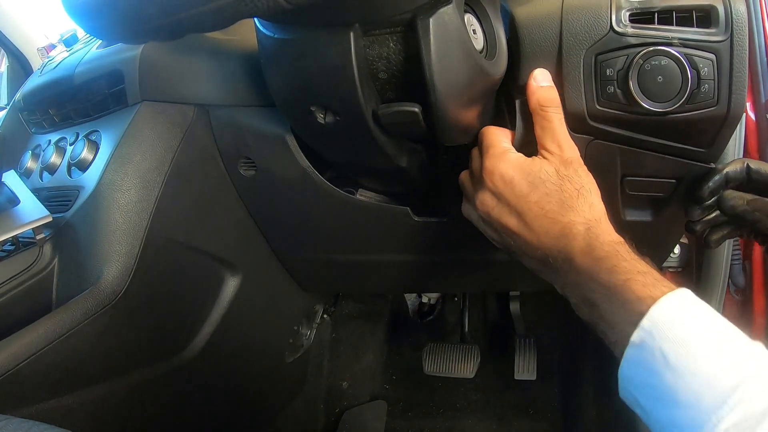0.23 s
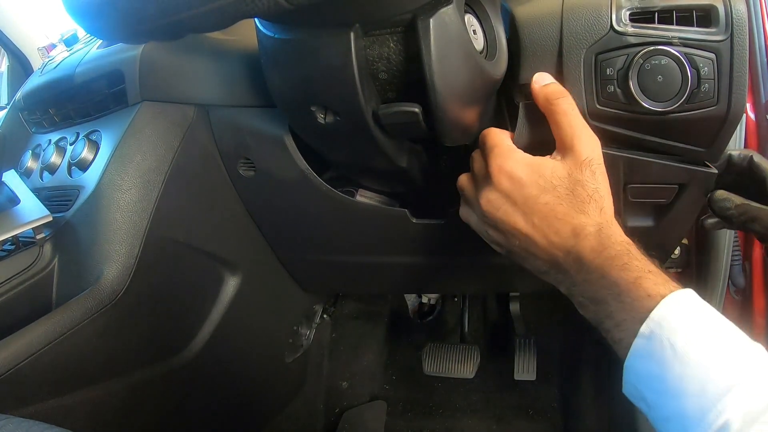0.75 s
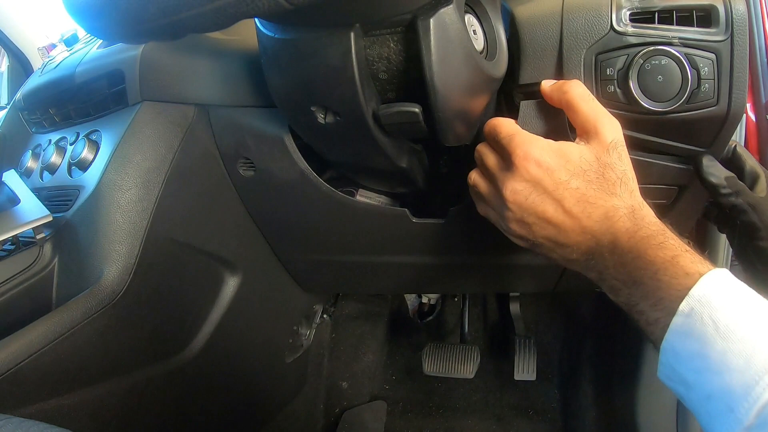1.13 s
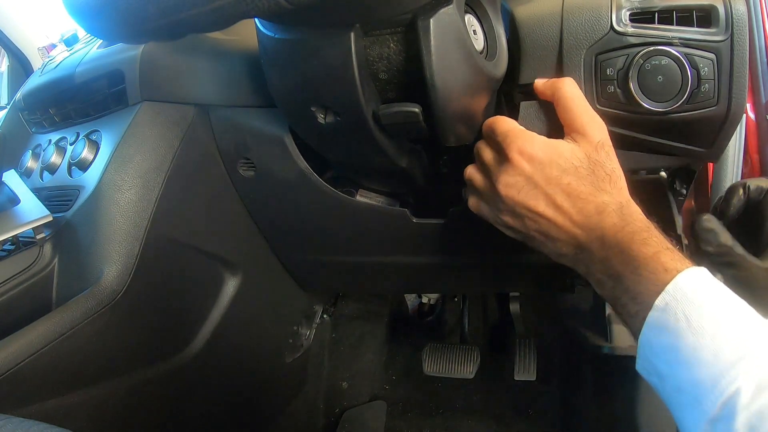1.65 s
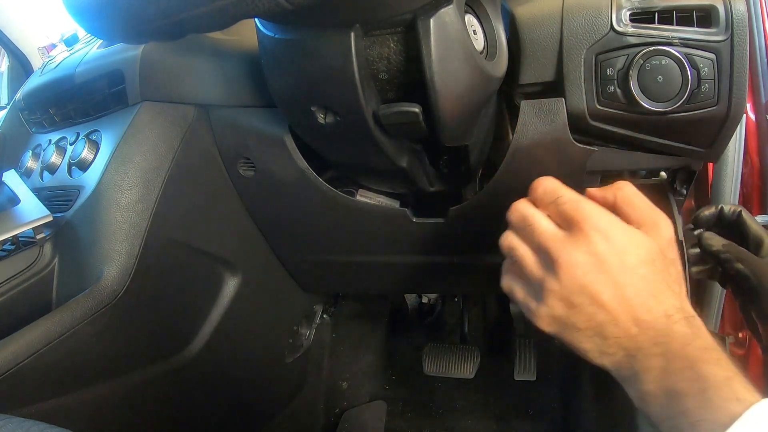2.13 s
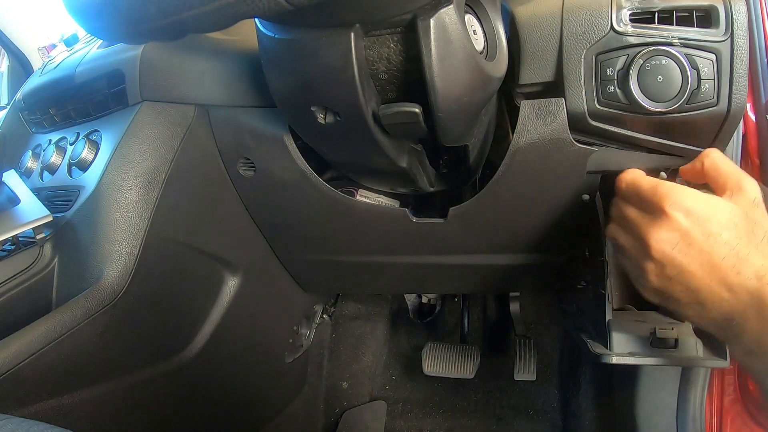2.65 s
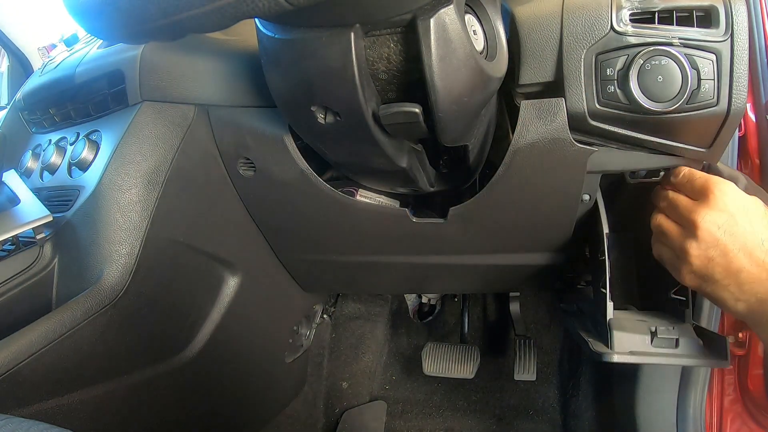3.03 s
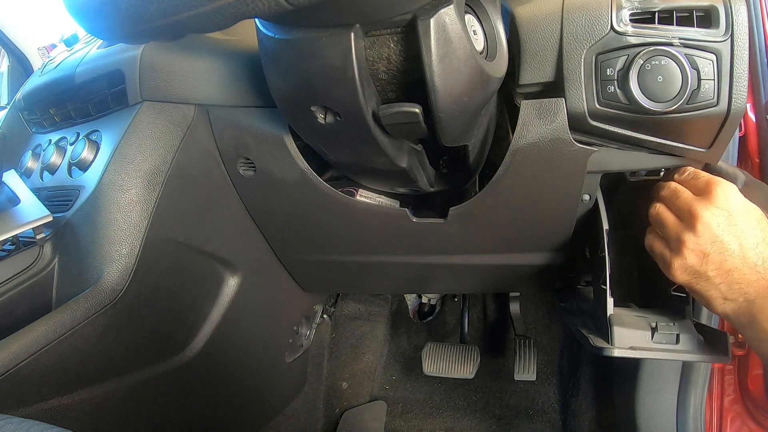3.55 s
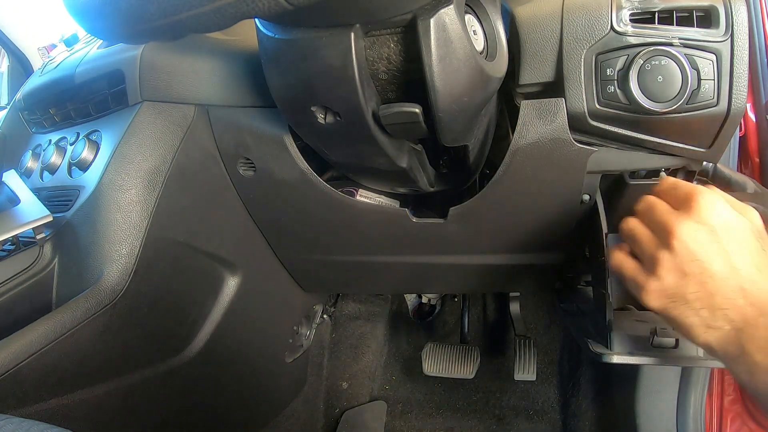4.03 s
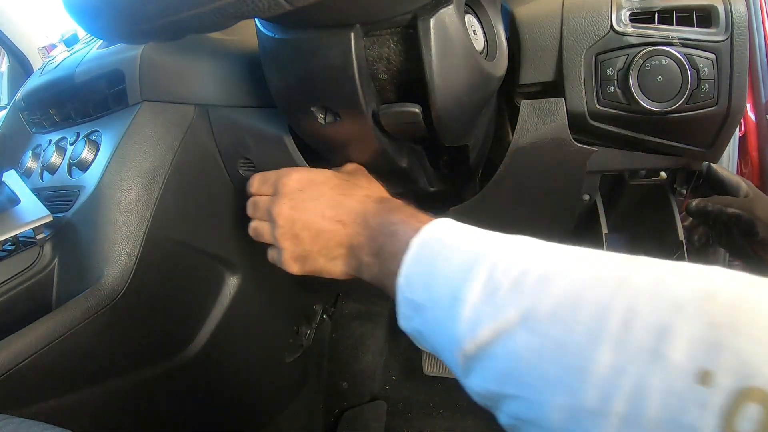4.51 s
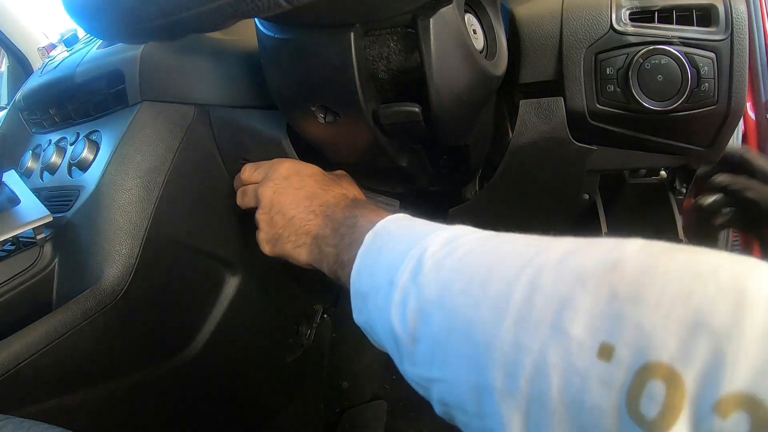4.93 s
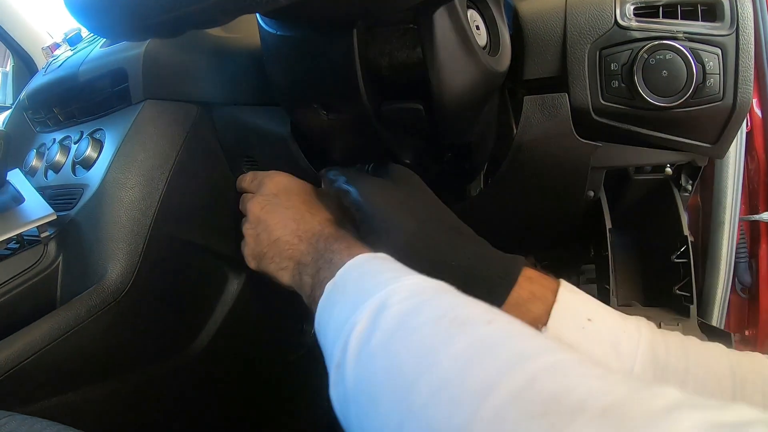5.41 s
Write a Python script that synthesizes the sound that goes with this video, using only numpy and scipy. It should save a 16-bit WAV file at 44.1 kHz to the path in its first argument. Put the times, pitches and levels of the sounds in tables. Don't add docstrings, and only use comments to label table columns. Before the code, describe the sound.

Hands pry a dashboard panel: two big bright snaps, a burst of hollow rattling knocks, then faint handling, an edge scrape and late thuds.

```python
import sys
import numpy as np
from scipy import signal
from scipy.fft import rfft, irfft, next_fast_len
from scipy.io import wavfile
from scipy.ndimage import uniform_filter1d, minimum_filter1d, map_coordinates

SR = 44100
rng = np.random.default_rng(int(sys.argv[2]) if len(sys.argv) > 2 else 0)


def file_out(sig):
    cols = np.atleast_2d(sig).T
    lim = np.clip(cols, -1, 1)
    pcm = np.round(lim * 32767).astype(np.int16)
    wavfile.write(sys.argv[1], SR, pcm)


def ratio_of_db(decibels):
    return 10 ** (np.asarray(decibels, float) / 20)


N = 250047

# (frequency [Hz], level [dB per Hz])
QUIET_TONE = [(12, -34.5), (20, -3), (54, 6.5), (119, -2.5), (196, 1.5), (274, -10), (534, -30), (767, -16),
              (1100, -18), (1820, -16), (5850, -33), (7520, -32.5), (15500, -68)]
# (frequency [Hz], likeness [-1 to 1])
LIKENESS = [(60, 0.24), (180, 0.98), (550, 0.47), (1650, 0.12), (4970, 0.51), (15000, -0.63)]
# (frequency [Hz], time to fall 60 dB [s])
CABIN_FADE = [(150, 0.16), (1000, 0.12), (4000, 0.1), (12000, 0.045)]
# (frequency [Hz], level [dB per Hz])
RUMBLE_TONE = [(12, -42), (20, -9.5), (48, 3.5), (75, -13.5), (110, 0), (140, -26.5), (240, -120)]
# (frequency [Hz], level [dB per Hz])
FLEX_TONE = [(41, -39.5), (70, -8), (188, 2.5), (259, -7), (420, -21.5), (450, -8), (580, -32), (990, -120)]
# (start [s], length [s], level [dB])
LEANING = [(0.347, 0.17, -49), (.62, 0.41, -48.5), (1.182, 0.079, -47.5), (1.403, 0.14, -50),
           (1.95, 0.082, -55.5), (2.547, 0.07, -51.5), (2.752, 0.078, -55), (3.19, .65, -60.5),
           (4.025, 0.13, -58.5), (4.3, 0.23, -59), (5.035, .1, -44.5)]
# (time [s], peak level [dB], boom note [Hz], time to fall 60 dB [s])
DASH_JOLTS = [(0.045, -16, 122.2, 0.16), (0.374, -36.5, 111.5, 0.35), (0.418, -26.5, 127, 0.073),
              (0.464, -3.5, 127.6, 0.14), (0.599, -20.5, 125.4, 0.12), (0.756, -32, 114, 0.24),
              (1.534, -11, 134, 0.14), (1.714, -33, 128, 0.4), (1.789, -21, 109.4, 0.22),
              (1.824, -24, 105.5, 0.12), (1.87, -25.5, 122.6, 0.16), (2.087, -22, 166, 0.061),
              (2.539, -46, 164, 0.18), (2.744, -52, 275, 0.25), (3.025, -29, 174, 0.074),
              (3.602, -49.5, 288, 0.17), (3.951, -43, 158.5, 0.25), (4.002, -35.5, 182, 0.14),
              (4.688, -38, 144, 0.18), (4.715, -40, 117, 0.36), (4.765, -32.5, 150, 0.13),
              (4.81, -30, 104.8, 0.16), (5, -15, 170, 0.073), (5.52, -28, 128, 0.3),
              (5.594, -25, 174.6, 0.099)]
# (frequency [Hz], level [dB])
FRAME_NOTES = [(49, -7.5), (71, 5)]
# (frequency [Hz], level [dB per Hz])
RUB_TONE = [(180, -41.5), (300, -5), (421, 2), (676, -2.5), (757, -0.5), (1040, -6.5), (1780, -5.5),
            (3500, -36), (4550, -46.5), (7700, -120)]
# (frequency [Hz], level [dB per Hz])
RUSTLE_TONE = [(1180, -24.5), (2000, -4), (3400, 1.5), (3730, -3.5), (7000, -9), (9100, -35.5),
               (15400, -120)]
# (frequency [Hz], level [dB per Hz])
SLEEVE_TONE = [(3240, -29), (5500, -11.5), (8200, 0.5), (11800, -11), (13800, -12), (15500, -34)]
# (time [s], pressure [dB], sliding speed [dB])
RESTING_GRIP = [(0.0, -53.5, 3), (0.154, -57, 5), (0.384, -63, 5), (0.72, -70.5, 4), (0.97, -61.5, -1),
                (1.2, -58.5, 5.5), (1.5, -47.5, 2.5), (1.58, -55.5, -2), (1.94, -56.5, -3),
                (2.17, -57.5, 0), (2.57, -64, -7.5), (2.73, -63.5, 7), (3.31, -64, -2.7), (3.76, -68, 5.5),
                (4.44, -72, -6), (4.92, -71.5, 14), (5.37, -74.5, 14), (5.67, -58.5, 6.5)]
# (start [s], length [s], pressure [dB], sliding speed [dB])
GLOVE_SLIDES = [(0.362, 0.043, -50.5, 2), (1.788, 0.051, -58, 8), (2.865, 0.015, -71.5, 23),
                (3.157, 0.083, -70, 5), (3.576, 0.073, -68.5, 12.5), (4.5, .04, -62, 4),
                (4.535, 0.045, -59, 9), (4.572, 0.07, -55.5, 12), (4.63, .04, -61, 14),
                (4.686, 0.095, -57.5, 6.5), (4.785, 0.041, -64.5, 20), (4.785, 0.065, -48, 3.5),
                (4.952, 0.036, -57, 5), (5.003, 0.025, -74, 12), (5.223, 0.016, -69.5, 3),
                (5.276, .1, -73.5, 14), (5.452, .018, -73, 12), (0.456, 0.013, -45, -3),
                (1.522, 0.0073, -43, -4), (1.778, .011, -44, -4), (2.087, 0.044, -61.5, -15),
                (5.026, 0.095, -69, 20.5), (1.799, 0.098, -46, -1), (5.514, 0.058, -66, 22.5),
                (5.594, 0.1, -56, -12)]
# (time [s], pressure [dB], sliding speed [dB], time to fall 60 dB [s])
PANEL_SETTLING = [
    (0.48, -42, 2, 0.5),
    (1.545, -47.5, 7, .3),
    (1.6, -46, -1, 0.87),
    (4.98, -46, 3, 0.31),
    (5.535, -43.5, -5, 0.14),
    (5.03, -48, -15, 0.42),
    (4.75, -51, -16, 0.28),
]
# (time [s], level [dB])
EDGE_DRAG = [(4.488, -47), (4.505, -54), (4.52, -44), (4.535, -52), (4.548, -46), (4.57, -56), (4.6, -55),
             (4.63, -62)]
# (frequency [Hz], width [Hz], level [dB])
EDGE_NOTES = [(495, 90, 0), (850, 200, -7), (1900, 400, -20)]
# (frequency [Hz], left minus right [dB])
SNAP_BALANCE = [(60, -1.5), (300, -1.2), (700, -5.5), (1400, -5), (3000, -5.5), (6000, 0.4), (12000, -0.5)]
# (frequency [Hz], phase lead [radians])
SNAP_LEAD = [(500, 0), (3000, .1), (5000, -.9), (8300, -1.5), (13000, -1.9)]
# (time [s], peak level [dB], knock [dB], crack [dB], strongest ring [Hz])
TAB_TICKS = [(0.0064, -36, -10, -9.5, 2800), (0.3285, -39.5, -23, -10, 2180),
             (0.3363, -39.5, -12, -9.5, 3050), (0.351, -39.5, -9, -12, 2970),
             (0.3627, -34.5, -11, -18, 2790), (1.1895, -43, -27, -12, 3660), (1.3369, -44, -7, -9, 2089),
             (1.3904, -40, -13, -12, 1700), (1.4239, -42, -13, -11, 2420), (1.4843, -39, -19, -15, 2780),
             (1.8453, -28.5, -5.5, -10, 2050), (3.538, -48, -14, -15.5, 2740),
             (3.5898, -45.5, -16, -9.5, 2830), (3.7492, -58, -10, 5.5, 1736),
             (4.086, -52, -20.5, -6.5, 4500), (4.7699, -47, -16, 8, 7260), (4.7923, -40.5, -8, -15, 1950),
             (4.8229, -38.5, -18, -11, 2630), (4.9692, -34.5, -11.5, -6, 2870),
             (4.997, -27, -12, -11, 3220), (5.037, -40.5, -19, -15, 2800), (5.4415, -53, -14, -7, 3750),
             (5.5936, -24.5, -4, -10.5, 1580), (5.648, -41.5, -4, -25, 1970)]
# (time [s], peak level [dB], knock [dB], crack [dB], strongest ring [Hz])
PANEL_KNOCKS = [(2.5352, -47.5, 8.5, -20, 754), (2.5421, -37, 1, -20, 571), (2.7456, -48.5, 7, -26, 670),
                (2.799, -49.5, -2, -10, 473), (2.8707, -47.5, -1, -12, 850), (3.0027, -48.5, 6, -17, 428),
                (3.0258, -32, -6, -13, 2290), (3.1682, -43, -2.5, -17, 505), (3.2443, -51.5, 7, -23, 785),
                (3.303, -53.5, 8, -19, 733), (3.3155, -41, -2, -13, 775), (3.951, -35.5, -2.5, -19.5, 811),
                (4.0031, -36, -0.5, -13, 500), (4.4765, -50, -8, -11, 500), (4.6881, -33, -2, -17.5, 646),
                (5.225, -47.5, -8, -16.5, 735), (5.526, -27, -6, -18.5, 412), (5.6113, -30.5, 3, -40, 520)]
# (time [s], peak level [dB], knock [dB], crack [dB], strongest ring [Hz])
EARLY_SLIPS = [
    (0.4605, -30, -4, -6, 900),
    (1.8705, -29, 0, -8, 670),
]
# (time [s], level [dB], notes as (frequency [Hz], level [dB], time to
# fall 60 dB [s]))
MORE_RINGS = [(1.1898, -35.5, [(3515, 0, .02), (2900, -7, .012)]), (3.026, -29, [(517, 2, .03),
              (1798, -6, .025), (3036, -9, .022), (4200, -10, .01)]), (3.3155, -35, [(750, 0, .025),
              (1712, -5, .025), (2993, -10, .025), (3962, -14, .02), (4900, -14, .015)]),
              (4.477, -22, [(500, 0, .03), (830, -10, .025), (1800, -26, .02)]),
              (4.997, -25, [(587, 0, .05), (1378, -12, .04), (1836, -10, .04), (3250, -2, .02)]),
              (1.846, -28, [(540, -2, .04), (2050, -3, .025), (4100, -3, .02)]),
              (1.7915, -9, [(690, 0, .022), (2050, -14, .02), (1350, -12, .025)]),
              (1.717, -30, [(1560, 0, .025), (2620, -3, .025)]), (1.911, -32, [(560, 0, .025),
              (900, -4, .02)]), (3.17, -47, [(800, -2, .02), (1950, 0, .025)]),
              (4.77, -43, [(7260, 0, .02), (3900, -5, .015)]), (4.688, -38, [(1200, 0, .03),
              (3000, -3, .025)]), (2.543, -42, [(581, -3, 0.058), (1507, 0, 0.021), (2821, -24, 0.074)]),
              (4.004, -41, [(501, 0, 0.099), (3278, -13, 0.075), (5243, -17, 0.045)]),
              (5.594, -33, [(2600, 0, .03), (3150, -1, .03), (1600, 2, .03), (4657, -8, .02)])]
# (time [s], level [dB], notes as (frequency [Hz], level [dB], time to
# fall 60 dB [s]))
RINGING_KNOCKS = [
    (.048, -14.5, [(574.4, 6.5, 0.047), (764, 0.5, 0.019), (2283, -15.5, 0.0274)]),
    (.464, -19.5, [(870, 8, 0.023), (2970, -7, 0.024)]),
    (1.53, -14.5, [(1349, 5, 0.035), (2230, -1, .035), (5810, -6.5, 0.021)]),
    (1.791, -12.5, [(2860, -10, 0.033)]),
    (1.717, -19, [(796, 5, 0.026), (850, -11, 0.027)]),
    (1.826, -10, [(660, 0, .024), (1367, -11, .025), (2950, -19, .025)]),
    (3.952, -38, [(775, 3, 0.022), (900, -1, 0.027), (2830, -6, 0.033)]),
    (1.8745, -14, [(668, 0, .028), (1163, -11, .025), (3004, -17, .025), (5350, -21, .02)]),
]
# (time [s], peak level [dB], knock [dB], crack [dB], strongest ring [Hz])
CLIP_SNAPS = [(0.0364, -42, 10, -21.5, 660), (0.0476, -16, 5.5, -19, 594), (0.0869, -48, 15, -8, 460),
              (0.1471, -45.5, 3.5, -10, 446), (0.415, -41, 4, -9.5, 577), (0.4632, -10, -4.5, -6, 510),
              (0.471, -11, -4.5, -16.5, 850), (0.4877, -33, -5, -21, 435), (0.5968, -29, 4.5, -22, 576),
              (0.7556, -40, 4, -27, 560), (1.5312, -10, -6.5, -3, 1430), (1.593, -39, -1, -16, 558),
              (1.6332, -40, -7, -24, 565), (1.717, -28.5, 8.5, -24.5, 760), (1.747, -29, 5, -32, 880),
              (1.7885, -16.5, -2, -6.5, 696), (1.826, -22, -2, -20, 690), (1.8745, -23, -3, -11, 670),
              (1.9121, -35, 7, -32, 530), (2.013, -61, -7.5, -13, 430), (2.0839, -45, 12.5, -11, 767)]


def unit(x):
    return x / np.sqrt(np.mean(x ** 2) + 1e-20)


def along(points, hz):
    f, v = np.transpose(points)
    return np.interp(np.log(hz + 1), np.log(f + 1), v)


def curves(rows):
    s, *cols = np.transpose(rows)
    return [np.interp(np.arange(N) / SR, s, c) for c in cols]


def wobble(rate):
    knots = rng.standard_normal(int(N * rate / SR) + 4)
    return map_coordinates(knots, [np.arange(N) * rate / SR])


def swell(s, length):
    middle = s + length / 2
    return np.exp(-((np.arange(N) / SR - middle) / (0.66 * length)) ** 4)


def dying(s, rise_s, t60):
    t = np.clip(np.arange(N) / SR - s, 0, None)
    return (1 - np.exp(-t / rise_s)) * ratio_of_db(-60 * t / t60)


def ringing(t, hz, t60, rise):
    return ratio_of_db(-60 * t / t60) * (1 - np.exp(-t * hz / rise)) * np.sin(2 * np.pi * hz * t)


def filtered(x, response):
    m = next_fast_len(N + 8192)
    return irfft(rfft(x, m) * response(np.fft.rfftfreq(m, 1 / SR)), m)[..., :N]


def rush(spectrum, source):
    def mix(hz):
        turn = np.arccos(np.clip(along(LIKENESS, hz), -1, 1)) / 2
        return ratio_of_db(along(spectrum, hz)) * np.array([np.cos(turn), np.sin(turn)])

    mid, side = filtered(source, mix)
    return unit(np.array([mid + side, mid - side]))


def add(track, s, sound):
    part = track[..., round(s * SR):][..., :sound.shape[-1]]
    part += sound[..., :part.shape[-1]]


def cabin(x):
    hz, t, z = signal.stft(rng.standard_normal((2, SR // 8)), SR, nperseg=128)
    tail = signal.istft(z * ratio_of_db(-60 * t / along(CABIN_FADE, hz)[:, None]), SR, nperseg=128)[1]
    return signal.fftconvolve(x[None], tail / np.linalg.norm(tail[0]), axes=1)


def quiet_floor():
    return ratio_of_db(-59) * rush(QUIET_TONE, rng.standard_normal((2, N)))


def shaking():
    lean = sum(ratio_of_db(db) * swell(s, length) for s, length, db in LEANING)
    sway = lean + sum(ratio_of_db(db - 10) * dying(s, 0.025, 0.35) for s, db, *_ in DASH_JOLTS)
    rumble = sway * unit(filtered(rng.standard_normal(N), lambda hz: ratio_of_db(along(RUMBLE_TONE, hz))))

    grip_db = curves(RESTING_GRIP)[0]
    flex = ratio_of_db(grip_db + 2.5) + ratio_of_db(-13.5) * lean
    flex = flex + sum(ratio_of_db(db - 18) * dying(s, 0.01, 0.3) for s, db, *_ in DASH_JOLTS)
    return rumble + flex * ratio_of_db(1.5 * wobble(13)) * rush(FLEX_TONE, rng.standard_normal((2, N)))


def dashboard_boom():
    boom, t = np.zeros(N), np.arange(SR // 2) / SR
    shell_notes = [(1, -0.5), (1.22, -7.5), (1.75, -4)]  # (times the boom note, dB)
    for s, db, hz, t60 in DASH_JOLTS:
        t60 = np.clip(t60, 0.03, 0.6)
        turn = 2 * np.pi * rng.random(5)
        shell, frame = 0, 0
        for (ratio, level), phase in zip(shell_notes, turn):
            shell = shell + ratio_of_db(level - 60 * t / t60 * ratio) * np.sin(2 * np.pi * hz * ratio * t + phase)
        for (f, level), phase in zip(FRAME_NOTES, turn[3:]):
            frame = frame + ratio_of_db(level - 60 * t / (2.45 * t60)) * np.sin(2 * np.pi * f * t + phase)
        shell = shell * (1 - np.exp(-t / 0.004))
        frame = ratio_of_db(-13.5) * frame * (1 - np.exp(-t / 0.011))
        add(boom, s, ratio_of_db(db) * (shell + frame))
    lag_s = 0.00016
    return filtered(boom, lambda hz: [ratio_of_db(-0.4) + 0 * hz, ratio_of_db(0.4) * np.exp(-2j * np.pi * hz * lag_s)])


def hands():
    moves = [(*curves(RESTING_GRIP), 1)]
    moves += [(db, speed_db, swell(s, length)) for s, length, db, speed_db in GLOVE_SLIDES]
    moves += [(db, speed_db, dying(s, 0.01, t60)) for s, db, speed_db, t60 in PANEL_SETTLING]
    grains = rng.standard_normal((2, N)) * ratio_of_db(2.5 * wobble(350) + 1.5 * wobble(40))
    fine = grains + 0.8 * rng.standard_normal((2, N))
    # (level over the rubbing [dB], growth [dB per dB of speed], tone, noise)
    layers = ((0, 0, RUB_TONE, grains), (-9.5, 0.64, RUSTLE_TONE, fine), (-18.5, 0.89, SLEEVE_TONE, fine))
    out = np.zeros((2, N))
    for over_db, grows, tone, source in layers:
        strength = sum(ratio_of_db(db + over_db + grows * speed_db) * shape for db, speed_db, shape in moves)
        out += strength * rush(tone, source)
    return ratio_of_db([[-1.2], [1.2]]) * out


def panel_edge():
    start, end = (EDGE_DRAG[0][0] - 0.01, -120), (EDGE_DRAG[-1][0] + 0.023, -120)
    (drag_db,) = curves([start, *EDGE_DRAG, end])
    slips = rng.standard_normal(N) * ratio_of_db(3 * wobble(300))

    def body(f):
        return sum(ratio_of_db(db) * (1j * f * w / (c * c - f * f + 1j * f * w)) ** 2 for c, w, db in EDGE_NOTES)

    return ratio_of_db(drag_db) * unit(filtered(slips, body)) * ratio_of_db([[-1.5], [1.5]])


def contact(t, t60, spread_db, ring_db, lasting, db, knock_db, crack_db, ring_hz):
    f, edges = np.fft.rfftfreq(len(t), 1 / SR), np.geomspace(330, 15500, num=15)
    mids = np.sqrt(edges[1:] * edges[:-1])[:, None]
    colour = [(400, knock_db + spread_db - 3), (900, knock_db + spread_db), (1600, -13.5), (2800, -8.5),
              (4300, 0.56 * crack_db - 7.5), (6000, crack_db - 3), (8000, crack_db - 4.5),
              (10400, crack_db - 15.5), (13600, crack_db - 31)]
    life = np.clip(t60, 0.01, 0.3) * (mids / 2000) ** -0.25
    fade = ratio_of_db(-60 * t / life) * (1 + np.exp(-t / 0.0053))
    fade = fade * (1 - np.exp(-t * mids / 0.55))
    fade = fade * (1 - np.exp(-t / 0.00098))

    bands = (f >= edges[:-1, None]) & (f < edges[1:, None])
    dense = fade * irfft(rfft(rng.standard_normal(len(t))) * bands)
    dense /= np.max(np.abs(dense), axis=1, keepdims=True)
    slips = ratio_of_db(3 * np.interp(t, np.arange(200) / 1500, rng.standard_normal(200)))
    rattle = ratio_of_db(along(colour, mids[:, 0])) @ (dense * slips ** (mids > 1000))
    ring = ringing(t, ring_hz, lasting * t60 * (ring_hz / 1000) ** -0.3, rise=0.18)
    return ratio_of_db(db) * (rattle + ratio_of_db(along(colour, ring_hz) + ring_db) * ring)


def contacts(rings, groups):
    near, far, t = np.zeros(N), np.zeros((2, N)), np.arange(4096) / SR
    hits = []
    for s, db, notes in rings:
        hits.append((s, sum(ratio_of_db(db + level) * ringing(t, hz, t60, rise=1.8) for hz, level, t60 in notes)))
    for table, *material in groups:
        for s, *strike in table:
            hits.append((s, contact(t, *material, *strike)))
    for s, hit in hits:
        add(near, s, hit)
        add(far, s + 0.0025, cabin(hit))

    def ports(hz):
        return [ratio_of_db(along(SNAP_BALANCE, hz) / side) * np.exp(1j * along(SNAP_LEAD, hz) / side)
                for side in (2, -2)]

    return filtered(near, ports) + ratio_of_db(-11.5) * far


def panel_clips():
    main = contacts(RINGING_KNOCKS, [(CLIP_SNAPS, 0.043, -9, 6, 0.7), (PANEL_KNOCKS, 0.04, -9, 6, 0.7),
                                  (TAB_TICKS, 0.06, -4, 4, 0.45)])
    return main + contacts(MORE_RINGS, [(EARLY_SLIPS, 0.043, -9, 6, 0.7)])


def scene():
    return quiet_floor() + shaking() + dashboard_boom() + hands() + panel_edge() + panel_clips()


def starved(x):
    treble = filtered(x, lambda hz: 1 / (1 + (2800 / (hz + 1)) ** 6))
    level = uniform_filter1d(np.abs(treble).mean(axis=0), size=60)
    ahead = -minimum_filter1d(-level, size=701, origin=-350)
    gap = uniform_filter1d(1.0 * (level < ahead * ratio_of_db(-33)), size=90)
    return x - treble * gap * (1 - ratio_of_db(-22))


def low_pass(x):
    return signal.sosfilt(signal.butter(12, 16020, fs=SR, output="sos"), x)


def record(dry):
    heard = filtered(dry, lambda hz: (1j * hz / (34 + 1j * hz)) ** 2)
    rounded = heard / (1 + np.abs(heard / 0.95) ** 6) ** (1 / 6)
    mix = starved(rounded)
    return low_pass(mix)


dry = scene()
out = record(dry)
file_out(out)
```